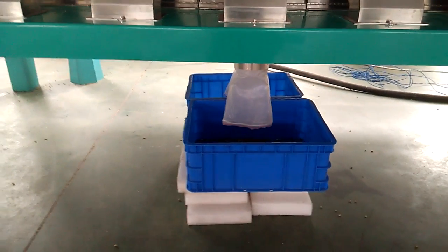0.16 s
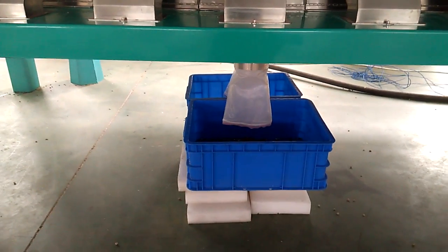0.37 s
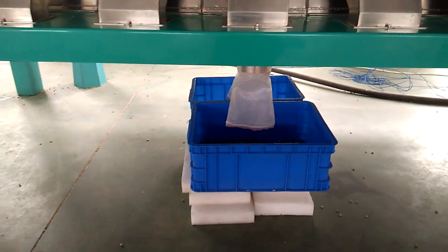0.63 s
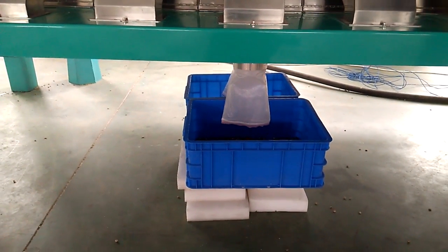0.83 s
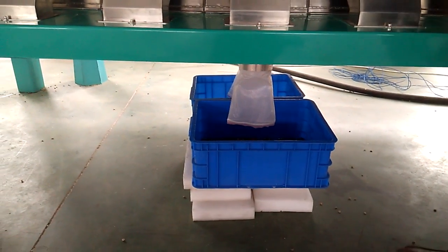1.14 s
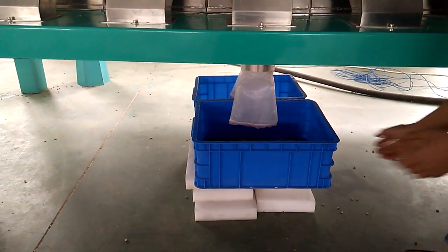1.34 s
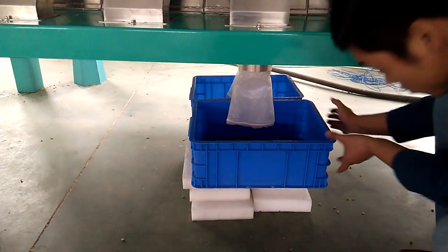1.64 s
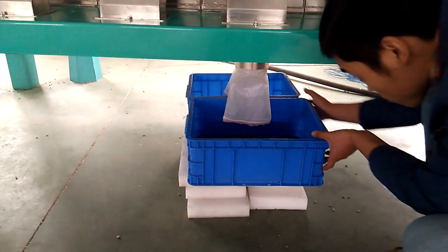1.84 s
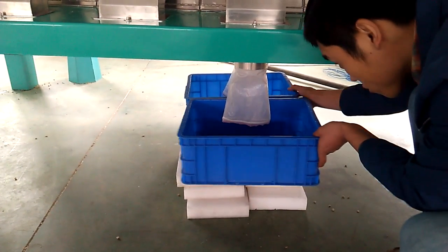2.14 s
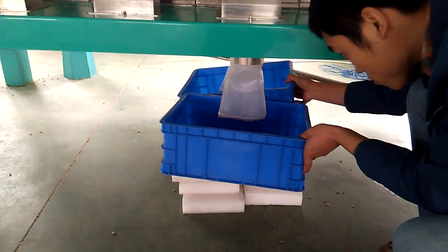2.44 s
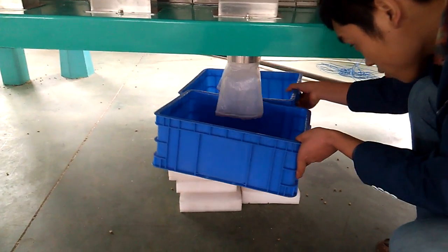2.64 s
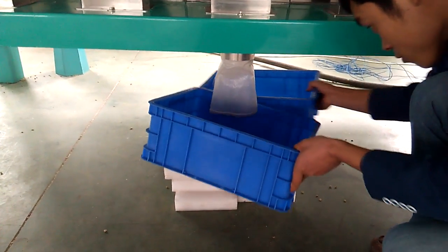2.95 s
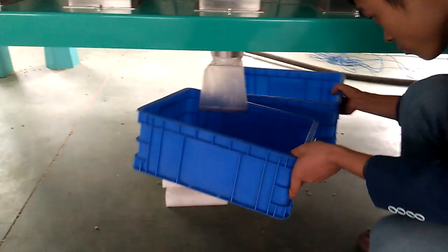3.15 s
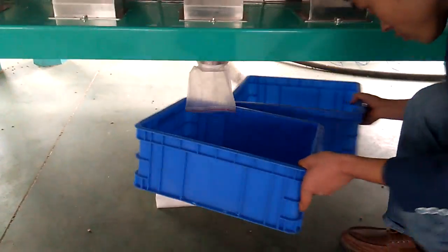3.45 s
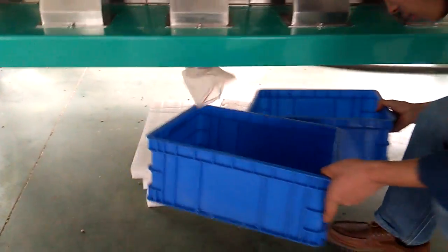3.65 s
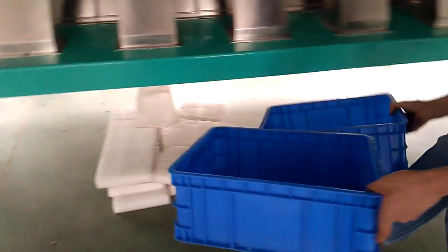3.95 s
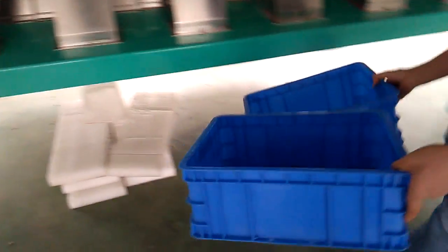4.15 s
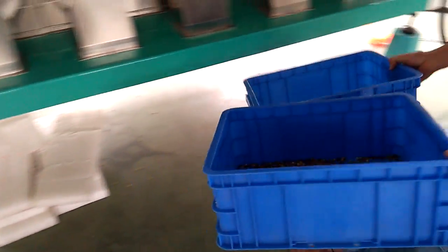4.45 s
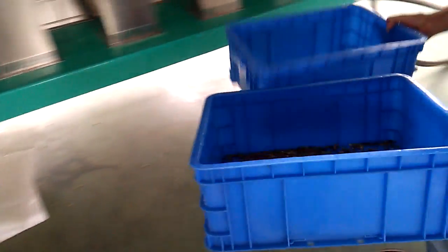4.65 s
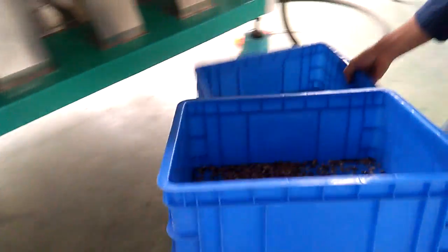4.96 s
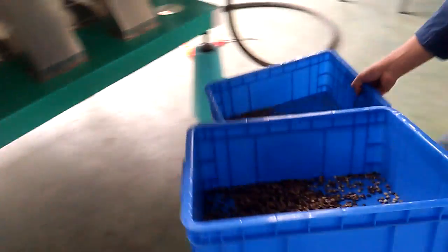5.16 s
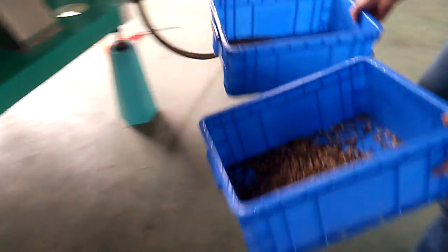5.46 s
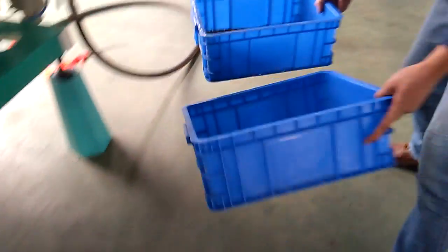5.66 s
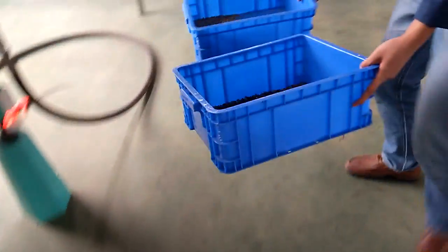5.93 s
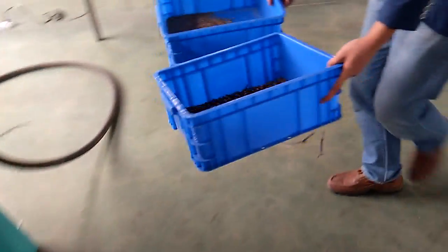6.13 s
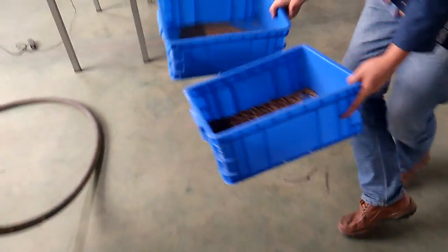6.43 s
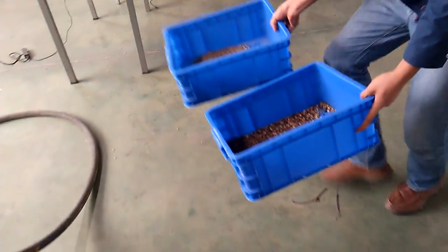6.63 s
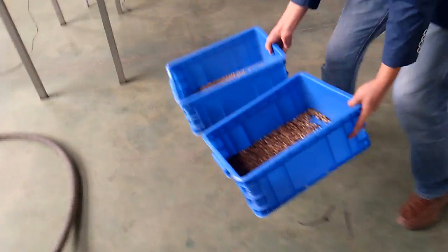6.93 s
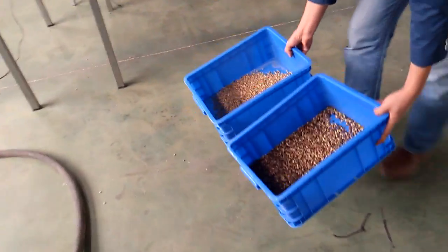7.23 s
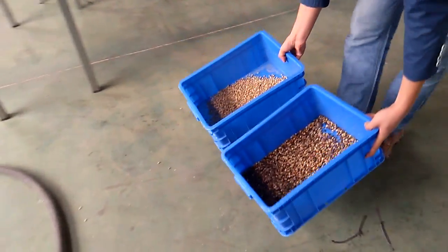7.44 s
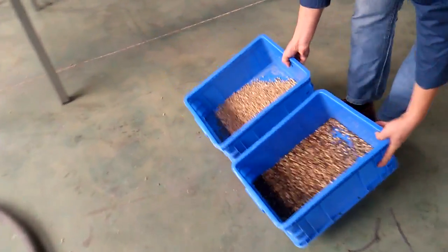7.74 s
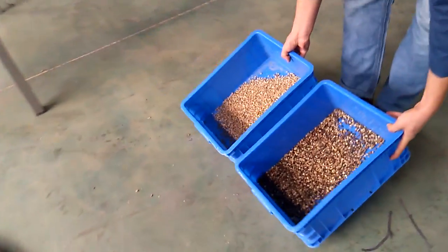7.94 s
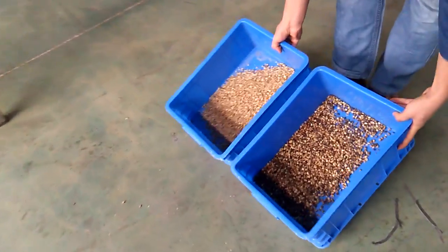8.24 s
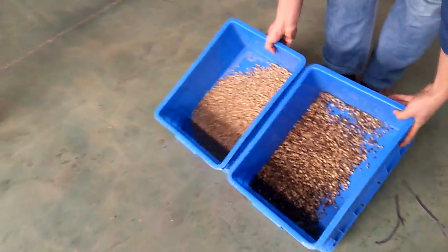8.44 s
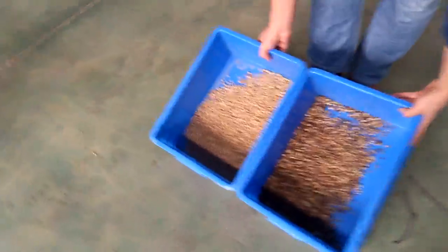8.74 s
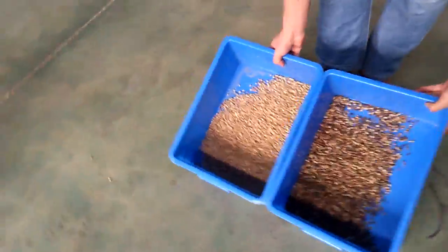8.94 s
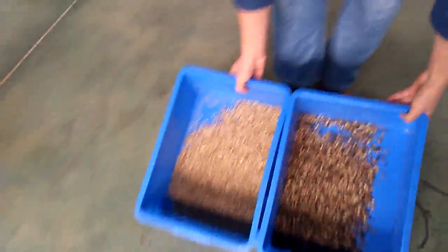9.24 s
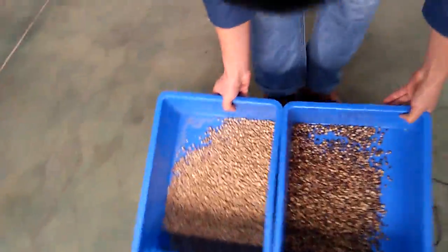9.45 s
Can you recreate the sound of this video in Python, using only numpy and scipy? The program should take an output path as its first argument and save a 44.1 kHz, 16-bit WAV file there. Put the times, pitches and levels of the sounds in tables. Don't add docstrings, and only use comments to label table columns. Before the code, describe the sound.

In a factory hall, dry beans patter from a chute, then plastic bins scrape and thud as a loud rush of beans slides inside them.

```python
import sys
import numpy as np
from scipy import signal
from scipy.fft import rfft, irfft, next_fast_len
from scipy.io import wavfile
from scipy.ndimage import uniform_filter1d, map_coordinates

SR = 44100
rng = np.random.default_rng(int(sys.argv[2]) if len(sys.argv) > 2 else 0)


def inscribe(sig):
    pcm = np.round(np.clip(np.atleast_2d(sig).T, -1, 1) * 32767)
    wavfile.write(sys.argv[1], SR, pcm.astype(np.int16))


def volts_from_db(level):
    exponent = np.asarray(level, float) / 20
    return 10 ** exponent


N = 422912

# peak in seconds, scrape level in dB, rise in seconds, fall in seconds, rattle over scrape in dB.
DRAG_STROKES = [(.02, -49, 0.13, 0.38, 12), (.28, -54.5, 1, 0.037, 9), (.49, -42.5, 0.012, 0.04, 0),
                (.82, -35.5, 0.034, 0.14, 0), (.87, -49, 0.045, 1, 1), (1.43, -56, 0.18, 0.37, 11.5),
                (2.02, -57, 0.017, 0.22, 1.5), (2.14, -49, 0.049, 0.22, 5), (2.52, -50.5, 0.11, 0.35, 10.5),
                (3.03, -51, 0.99, 0.056, 9), (3.08, -36, 0.011, 0.049, -2), (3.178, -42, 0.2, 0.091, 1),
                (3.248, -44.5, 0.076, 0.23, 7.5), (3.372, -47, 0.046, 0.091, 8),
                (3.39, -40.5, 0.025, 0.044, 7), (3.47, -45, 0.054, 0.76, 8.5), (3.65, -36, 0.14, 0.17, 1),
                (3.6, -39, 0.022, 0.056, -2), (3.784, -38.5, 0.077, 0.48, -1.5),
                (3.91, -45, 0.16, 0.49, 6.5), (4.86, -45.5, 0.21, 0.61, 1), (7.08, -58.5, 0.11, 0.52, 2.5),
                (8.15, -68.5, 0.03, 0.18, 10.5), (8.5, -48, 0.16, 0.45, -5), (9.0, -70, 0.34, 0.48, 14.5),
                (9.41, -66.5, 0.4, 0.43, 7)]
# peak in seconds, scrape level in dB, rise in seconds,
# fall in seconds, rattle over scrape in dB.
TILT_SLIDES = [(4.18, -41, 0.051, 0.21, -1), (4.3, -32.5, 0.24, 0.5, 6), (4.965, -22.5, 0.056, 0.22, 9),
               (5.075, -18.5, 0.056, 0.15, 10.5), (5.115, -19.5, 0.16, 0.08, 15),
               (5.15, -31.5, .04, .12, 13), (5.21, -44.5, 0.093, 0.38, 14.5),
               (5.33, -58, 0.088, 0.18, 14.5), (5.49, -57.5, 0.15, 0.16, 12),
               (5.604, -42.5, .008, 0.16, 5.5), (5.66, -31, 0.059, 0.36, 6.5),
               (5.92, -28.5, 0.31, 0.37, 6.5), (6.07, -31, 0.55, 0.18, 5.5), (6.32, -52, 0.057, 0.38, 8),
               (6.48, -31, 0.07, 0.47, -6), (6.53, -29.5, 0.098, 0.16, 11), (6.64, -37, 0.31, 0.26, 0),
               (6.79, -39, 0.3, 0.11, 11.5), (6.88, -58, .08, 0.22, 10.5), (7.2, -57.5, 0.24, 0.48, 14.5),
               (7.69, -62.5, 0.29, 0.42, 10.5), (7.96, -36, 0.025, 0.061, 6),
               (8.0, -54.5, 0.032, 0.19, 8.5), (8.3, -51.5, 0.15, 0.39, 9.5), (8.45, -60.5, .15, .15, 4.5),
               (8.57, -46, .2, 0.32, 7), (8.7, -63.5, .05, 0.13, 7.5)]
# time in seconds, left-right difference in dB.
TREBLE_PAN = [(0.0, 7), (0.35, 2), (0.51, 8), (0.77, -10), (1.79, 24.5), (2.35, -5), (2.67, 1), (4.78, 3.5),
              (5.45, -3.5), (5.53, 2), (7.1, 1), (7.42, 4.5), (7.74, 13.5), (7.88, -0.5), (8.81, -1.5),
              (9.16, 2.5), (9.27, -7.5), (9.59, -5.5)]
# frequency in Hz, density in dB per Hz.
RATTLE_COLOUR = [(2650, -18), (4500, -3.5), (6000, -1), (9000, 2.5), (12000, 4), (15000, 5.5),
                 (17000, -55.5)]
# frequency in Hz, density in dB per Hz.
SCRAPE_COLOUR = [(650, -34.5), (1100, -7.5), (1380, 0), (1670, -6), (1990, 1), (3300, 0), (4200, 1),
                 (5500, -1.5), (7150, -7), (12100, -120)]
# frequency in Hz, density in dB per Hz.
WALL_COLOUR = [(88, -48.5), (150, -40), (258, 1), (329, -12), (708, 0), (1000, -5), (1400, -12), (1820, -6),
               (3080, -120)]
# time in seconds, peak in dB, clack over peak in dB.
CHUTE_BEANS = [(0.012, -23.5, -26), (0.038, -21.5, -32), (0.0432, -18.5, -30), (0.05, -22, -28),
               (0.063, -20.5, -17), (0.08, -23, -25), (0.101, -14, -15), (0.113, -17, -30),
               (0.128, -20, -27), (0.147, -19.5, -8), (0.186, -28, -5), (0.197, -26.5, -18),
               (0.2209, -30, -2), (0.233, -28, -30), (0.2432, -28.5, -13), (0.2468, -26, -5),
               (0.254, -29, -17), (0.2852, -24.5, -4.5), (0.336, -35, -28), (0.3845, -39, -35),
               (0.397, -37, -40), (0.3997, -32.5, -42), (0.4449, -25, -23), (0.4798, -23.5, -8),
               (0.485, -20, -7.5), (0.502, -19, -14), (0.762, -36.5, -16), (0.7673, -33.5, -10),
               (0.775, -35, -18), (0.804, -19.5, -15)]
# time in seconds, peak in dB,
# clack over peak in dB.
BIN_TICKS = [(2.2674, -56, -10), (3.0769, -30.5, -3), (3.2078, -13.5, -25), (3.2442, -13.5, -8),
             (3.3635, -25, -22), (3.3675, -11, -11), (3.3712, -11.5, -8), (3.462, -22.5, -27),
             (3.4655, -18.5, -22), (3.4844, -28.5, -17), (3.534, -25, -15), (3.5378, -19, -2.5),
             (3.5452, -18.5, -6), (3.597, -24.5, 6), (3.647, -23, -10), (3.7808, -32, -12),
             (3.798, -19, -12), (3.8745, -23, -18), (3.9168, -20.5, -19), (3.9399, -27, -18),
             (4.1425, -27.5, -13), (4.1799, -26, -18), (4.4782, -23, -18), (4.4978, -18, -22),
             (4.511, -26.5, -20), (4.536, -24.5, -14.5), (4.5989, -27, -20), (4.6173, -24, -23.5),
             (4.6335, -20.5, -33), (4.705, -28.5, -15), (4.7205, -31, -27), (4.7386, -24.5, -13),
             (4.7562, -29.5, -26), (4.9053, -23, -11), (4.9132, -23, -14), (4.932, -15.5, -16),
             (4.9431, -12.5, -14.5), (4.963, -3, -18.5),
             (5.5684, -34.5, -25.5), (5.6007, -32, -25.5), (5.6244, -27, -15), (5.6568, -20, -20),
                  (5.881, -18, -20), (5.934, -11.5, -20), (5.969, -20, -20), (6.242, -28, -24),
                  (6.316, -28.5, 0.5), (6.4485, -18, -20), (6.4713, -13, -19), (6.8102, -19.5, -30),
                  (6.8999, -27.5, -43), (6.915, -31, -27), (7.053, -34.5, -24), (7.077, -34, -21),
                  (7.102, -38, -30), (7.168, -30, -30), (7.2105, -28, -29), (7.238, -33, -27),
                  (7.425, -29, -45.5), (7.943, -18, -12), (7.9556, -21.5, -19.5), (7.9772, -21, -6),
                  (8.2857, -28, 4.5), (8.3426, -27, -22), (8.513, -26.5, -20), (8.5684, -31.5, -9),
                  (8.6936, -30, -28), (8.729, -31, -26.5), (8.7563, -34, -24), (8.8111, -36.5, -22),
                  (8.8704, -44.5, -25), (8.9093, -31, -23), (8.9234, -34, -25.5), (9.2966, -40, -23)]
# time in seconds, peak in dB.
RIM_SNAPS = [(0.0408, -20), (0.1022, -11), (0.1142, -19), (0.1298, -20), (0.1482, -21), (0.4865, -19),
             (3.2095, -5), (3.245, -4), (3.3693, -11), (3.3725, -10), (4.6342, -21), (5.9355, -13)]
# time
# in seconds, peak in dB, low mode in Hz, high mode in dB, high mode in Hz.
WALL_THUDS = [(0.018, -45.5, 368, 12.5, 553), (.059, -53, 101, 14.5, 560), (.1, -53, 300, 10, 537),
              (0.588, -45, 233, -24, 510), (.627, -40, 246, -16, 520), (.827, -26.5, 109, -4.5, 399),
              (1.242, -41, 231, -4, 538), (1.329, -34.5, 231, -2.5, 548), (2.128, -25, 161, -9.5, 296),
              (2.173, -26.5, 323, -20, 488), (2.265, -26, 238, -7.5, 614), (2.33, -41.5, 226, 1, 635),
              (2.477, -43.5, 152, 4.5, 650), (2.576, -40, 436, -14, 680), (2.69, -27, 235, -10.5, 526),
              (2.938, -50, 272, 3, 630), (3.005, -42.5, 298, 6, 650), (3.075, -32, 197, -8, 572),
              (3.152, -38, 287, 4, 562), (3.198, -46, 270, 1, 670), (3.221, -37, 268, 3, 574),
              (3.279, -37, 291, -6, 583), (3.348, -48, 249, 3, 564), (3.377, -33, 285, -4, 676),
              (3.461, -37, 320, -2, 543), (3.598, -30.5, 330, -19, 643), (3.635, -32, 326, -19, 920),
              (3.768, -26.5, 317, -8, 883), (5.096, -24, 318, -18, 600), (5.356, -25, 240, -18, 603),
              (7.465, -37.5, 235, -23, 510), (7.671, -34.5, 321, -9, 725), (7.939, -28.5, 303, -11, 413),
              (7.956, -23, 209, -15, 721), (8.103, -37.5, 246, -30, 502), (8.281, -22.5, 268, -5.5, 517),
              (8.298, -30.5, 207, -4, 700), (8.68, -29, 231, -6.5, 565), (8.778, -34.5, 233, -14, 560),
              (9.249, -33, 215.5, -34, 557),
              (0.02, -27, 903, -19, 1120), (0.855, -29, 382, -3, 758), (4.85, -31, 268, -11, 550),
               (5.179, -35, 201, -22, 400), (6.514, -29.5, 288, -26, 590), (6.665, -32.5, 108, -28, 300),
               (7.057, -48, 294, -9, 750), (7.332, -45, 192, -27, 403), (7.629, -46, 369, -14, 700),
               (8.925, -41, 393, -25, 705), (8.962, -45, 379, -24, 680), (9.009, -41, 372, -24, 698),
               (9.045, -44, 389, -25, 700), (9.08, -45, 398, -27, 700), (9.125, -52, 943, -12, 905),
               (9.225, -40, 219.4, -25, 600), (9.111, -41, 320, -22, 646)]
# time in seconds, peak in dB, low mode in Hz,
# high mode in dB, high mode in Hz.
CHUTE_BOOMS = [
    (0.804, -32.5, 290.6, -11, 560),
    (0.9, -30, 119.4, -17.5, 400),
]
# time in seconds, peak
# in dB, pitch in Hz, t60 in seconds.
SCUFFS = [(0.4846, -33, 2730, 0.016), (0.4994, -36, 2400, 0.038), (0.806, -21.5, 2975, 0.29),
          (0.82, -27.5, 2010, 0.47), (1.332, -37, 1478, 0.12), (2, -47, 1655, 0.49),
          (2.4, -54, 2000, 0.3), (7.494, -43, 1802, 0.16), (7.673, -25.5, 1594, 0.068),
          (7.673, -49, 2684, 0.052), (7.71, -42, 1916, 0.21), (8.303, -28.5, 1430, 0.07),
          (7.952, -40, 1647, 0.065), (0.445, -35.5, 1400, 0.035), (4.535, -35, 1893, .2),
          (4.95, -23, 3130, .25), (5.06, -13, 3204, .35), (5.2, -35.5, 3280, .4),
          (5.35, -42.5, 3480, .4), (5.46, -39, 3490, .3), (6.475, -28, 3770, .3),
          (0.13, -27.5, 1497, 0.046), (3.378, -38, 1350, .08), (2.43, -42, 1107, 0.16),
          (7.7, -43, 2560, 0.2), (8.1414, -31, 2684, 0.034), (8.142, -48, 2096, 0.042),
          (8.2, -47, 2310, .2), (7.69, -40.5, 1605, 0.24), (7.725, -47, 2282, .15),
          (8.146, -44.5, 2387, 0.29), (8.171, -56, 2087, 0.16)]
# frequency in Hz, t60 in seconds.
HALL_ECHO = [(200, 0.65), (2000, 0.9), (10000, 0.23)]
# time in seconds, frequency in Hz.
MOTOR_PITCH = [(0, 63.6), (4.3, 62.2), (4.8, 64.86), (9.59, 66.5)]
# time in seconds, level in dB.
HUM_LEVEL = [(0.0, -52), (0.21, -44.5), (0.59, -65), (1.44, -43.5), (1.65, -51.5), (2.0, -34), (2.35, -38),
             (2.51, -58), (2.86, -39), (4.54, -52), (4.91, -38), (6.46, -38.5), (6.54, -50), (7.88, -64),
             (8.41, -50), (8.8, -70), (9.4, -43), (9.59, -71.5)]
# time in seconds, rumble level in dB, handling level in dB.
RUMBLE_HAND_LEVEL = [(0.0, -59, -56), (0.51, -63, -69), (1.12, -58.5, -70), (1.36, -56.5, -51.5),
                     (3.87, -50, -57), (4.73, -54.5, -62), (5.13, -41.5, -53), (5.34, -57, -53),
                     (6.67, -57.5, -48.5), (6.76, -61.5, -63), (7.4, -59.5, -51), (7.8, -54, -62),
                     (8.3, -52.5, -51), (8.84, -54.5, -62), (9.4, -55, -52), (9.59, -58, -64.5)]
# time in
# seconds, level in dB.
AIR_LEVEL = [(0, -64), (.7, -61), (0.85, -46), (0.94, -49.5), (1.51, -45.5), (1.64, -48), (2.02, -51),
             (2.26, -62.5), (2.48, -58.5), (2.64, -53), (3.1, -48.5), (3.4, -53), (5.5, -74), (7, -61),
             (7.9, -65), (8.9, -63), (9.23, -68.5), (9.59, -63.5)]
# frequency in Hz, density in dB per Hz.
AIR_COLOUR = [(900, -50.5), (1500, -21.5), (3000, -8.5), (5500, -16), (7500, 1), (10000, 1.5), (15000, 6.5),
              (17000, -55.5)]
# frequency in Hz, density in dB per Hz.
RUMBLE_COLOUR = [(35, -29.5), (60, 2.5), (129, -8.5), (209, -10.5), (378, -11.5), (478, -23), (559, -28),
                 (996, -26.5), (1150, -54.5), (2500, -33), (3250, -76), (5500, -120)]
# frequency in Hz, density in dB per Hz.
HAND_COLOUR = [(12, -35.5), (25, -21), (45, 5), (70, -15.5), (110, -37), (200, -87)]
# frequency in Hz, left-right likeness from -1 to 1.
LIKENESS = [(60, 0.95), (180, 0.99), (550, 0.73), (1640, 0.29), (4950, 0.037), (14900, -0.1)]
# frequency in Hz, gain in dB.
LEFT_CAVITY = [(3000, -4), (7300, -1), (8500, 4), (9800, 9), (11500, 2), (14300, -10.5)]
# frequency in Hz, gain in dB.
RIGHT_CAVITY = [(3000, -3.5), (5000, -6), (7400, 3.5), (8500, 0), (9500, -8), (10500, -10.5),
                (11500, -16.5), (12500, -20), (14300, -19)]


def beans():
    drag, tilt = swells(DRAG_STROKES), swells(TILT_SLIDES)
    scrape_gain, rattle_gain = np.sqrt(drag + tilt)
    wall_gain = np.sqrt(drag[0] * volts_from_db(2 * 0.5) + tilt[0] * volts_from_db(2 * -8) + volts_from_db(2 * -63.5))
    clump = wobble(45)
    rattle = volts_from_db(1.5 + 1.0 * clump) * treble_sides() * stereo(patter(4500, 1.8, 0.83), RATTLE_COLOUR)
    floor = patchy(patter(1500, 2.7, 1.4), depth_db=3.0)
    scrape = volts_from_db(4.5 + 0.31 * clump + 1.2 * wobble(30)) * stereo(floor, SCRAPE_COLOUR)
    wall = volts_from_db(-0.8 + 1.5 * wobble(25)) * stereo(patter(500, 4.8, 1.164), WALL_COLOUR)
    return rattle_gain * rattle + scrape_gain * scrape + wall_gain * wall


def swells(rows):
    hop = 32
    t = np.arange(0, N, hop) / SR
    scrape, rattle = 0, 0
    for s, db, rise_s, fall_s, rattle_db in rows:
        rising = (abs(t - s) / rise_s) ** 1.585
        falling = (abs(t - s) / fall_s) ** 1.215
        away = np.where(t < s, rising, falling)
        power = volts_from_db(db - 26.5 * away) ** 2
        scrape = scrape + power
        rattle = rattle + power * volts_from_db(rattle_db) ** 2
    return np.repeat([scrape, rattle], hop, axis=1)[:, :N]


def patter(rate, spread_db, hush):
    hit = rng.random((2, N)) < rate / SR
    size = volts_from_db(spread_db * rng.standard_normal((2, N))) * rng.choice([-1, 1], (2, N))
    return unit(hit * size) + hush * rng.standard_normal((2, N))


def patchy(pair, depth_db):
    z = signal.stft(pair, nperseg=1024)[2]
    field = uniform_filter1d(rng.standard_normal(z.shape[1:]), size=3, axis=0)
    field = uniform_filter1d(field, size=5, axis=1)
    return signal.istft(z * volts_from_db(depth_db * unit(field)), nperseg=1024)[1][:, :N]


def ticks():
    t = np.arange(SR // 8) / SR
    snap, clack = np.zeros((2, 2, N + len(t)))
    click = volts_from_db(-60 * t / 0.007) * (1 - np.exp(-t / 0.0003))
    shiver = volts_from_db(-60 * t / 0.041) * (1 - np.exp(-t / 0.00031))
    for s, db, clack_db in CHUTE_BEANS + BIN_TICKS:
        start = round((s + .001) * SR)
        at = slice(start, start + len(t))
        snap[:, at] += volts_from_db(db) * (0.62 * click + volts_from_db(-10.0) * shiver)
        clack[:, at] += volts_from_db(db + clack_db - 5) * shiver
    spikes = np.zeros(N)
    for s, db in RIM_SNAPS:
        spikes[round(s * SR)] = volts_from_db(db)
    signs = np.sign(rng.standard_normal((2, N)))
    struck = (snap[:, :N] * signs + spikes) * treble_sides()
    bright = volts_from_db(3.0) * filtered(struck, lambda hz: volts_from_db(along(RATTLE_COLOUR, hz)))
    return bright + volts_from_db(-1) * clack[:, :N] * stereo(rng.standard_normal((2, N)), SCRAPE_COLOUR)


def bins():
    out, t = np.zeros((2, N + SR)), np.arange(SR // 3) / SR
    wall_t60_s, boom_t60_s = 0.11, 0.67
    blows = [(*row, wall_t60_s) for row in WALL_THUDS]
    blows += [(*row, boom_t60_s) for row in CHUTE_BOOMS]
    for s, db, low_hz, high_db, high_hz, t60 in blows:
        fade = volts_from_db(db - 60 * t / t60) * (1 - np.exp(-t / 0.0025))
        modes = rough_ring(low_hz, t, 0.058) + volts_from_db(high_db + 5.5) * rough_ring(high_hz, t, 0.087)
        cluster = sum(rough_ring(high_hz * k, t, 0.051) for k in (.7, 1.45, 2.1, 2.9))
        out[:, round(s * SR):][:, :len(t)] += fade * (modes + volts_from_db(high_db - 16.0) * cluster)
    for s, db, hz, t60 in SCUFFS:
        fade = volts_from_db(db - 60 * t / np.clip(t60, .02, .4)) * (1 - np.exp(-t / 0.0013))
        band = rough_ring(hz, t, 0.271) + 0.29 * rough_ring(1.7 * hz, t, 0.46)
        out[:, round(s * SR):][:, :len(t)] += fade * band
    return out[:, :N]


def rough_ring(hz, t, rough):
    shared, own = rng.standard_normal(len(t)), rng.standard_normal((2, 1))
    return np.sin(2 * np.pi * hz * t + rough * np.cumsum(shared) + 0.5 * own * hz / 500)


def echo(x):
    hz, t, z = signal.stft(rng.standard_normal((2, SR // 2)), SR, nperseg=256)
    decay = volts_from_db(-60 * t / along(HALL_ECHO, hz)[:, None])
    tail = signal.istft(z * decay, SR, nperseg=256)[1]
    return signal.fftconvolve(x, tail / np.linalg.norm(tail[0]), axes=1)[:, :N]


def hall():
    (hz,), (hum_db,), (air_db,) = curves(MOTOR_PITCH), curves(HUM_LEVEL), curves(AIR_LEVEL)
    rumble_db, hand_db = curves(RUMBLE_HAND_LEVEL)
    hum = np.sqrt(2) * volts_from_db(hum_db) * np.sin(2 * np.pi * np.cumsum(hz) / SR)
    rumble = volts_from_db(rumble_db + 5.0 + 2.2 * wobble(8.5)) * stereo(rng.standard_normal((2, N)), RUMBLE_COLOUR)
    hand = volts_from_db(hand_db + 1.5 * wobble(6.1)) * stereo(rng.standard_normal((2, N)), HAND_COLOUR)
    hiss = stereo(rng.standard_normal((2, N)), AIR_COLOUR)
    air = volts_from_db(air_db + 4.0 + 1.7 * wobble(29)) * sides(4.4) * hiss
    return hum * sides(-.6) + rumble + hand + air


def unit(x):
    return x / np.sqrt(np.mean(x ** 2) + 1e-20)


def along(points, hz):
    f, v = np.transpose(points)
    return np.interp(np.log(hz + 1), np.log(f + 1), v)


def curves(rows):
    s, *cols = np.transpose(rows)
    return [np.interp(np.arange(N) / SR, s, c) for c in cols]


def wobble(rate):
    knots = rng.standard_normal(int(N * rate / SR) + 4)
    return map_coordinates(knots, [np.arange(N) * rate / SR])


def filtered(x, response):
    m = next_fast_len(N + 8192)
    return irfft(rfft(x, m) * response(np.fft.rfftfreq(m, 1 / SR)), m)[..., :N]


def sides(db):
    return volts_from_db(np.outer([.5, -.5], db))


def treble_sides():
    return sides(curves(TREBLE_PAN)[0] - 4.5)


def stereo(pair, spectrum):
    def response(hz):
        turn = np.arccos(np.clip(along(LIKENESS, hz), -1, 1)) / 2
        return volts_from_db(along(spectrum, hz)) * [np.cos(turn), np.sin(turn)]
    mid, side = filtered(pair, response)
    return unit(np.array([mid + side, mid - side]))


def scene():
    knocks = bins() + ticks()
    return knocks + volts_from_db(-12.0) * echo(knocks) + beans() + hall()


def band_limit(x):
    return signal.sosfilt(signal.butter(12, 15300, fs=SR, output="sos"), x)


def record(dry):
    def port_response(hz):
        cavities = np.array([along(LEFT_CAVITY, hz), along(RIGHT_CAVITY, hz)])
        return volts_from_db(cavities) * (hz < 14380)
    ports = filtered(dry, port_response)
    overloaded = ports / (1 + np.abs(ports / 1.15) ** 8) ** (1 / 8)
    return band_limit(overloaded)


dry = scene()
out = record(dry)
inscribe(out)
```